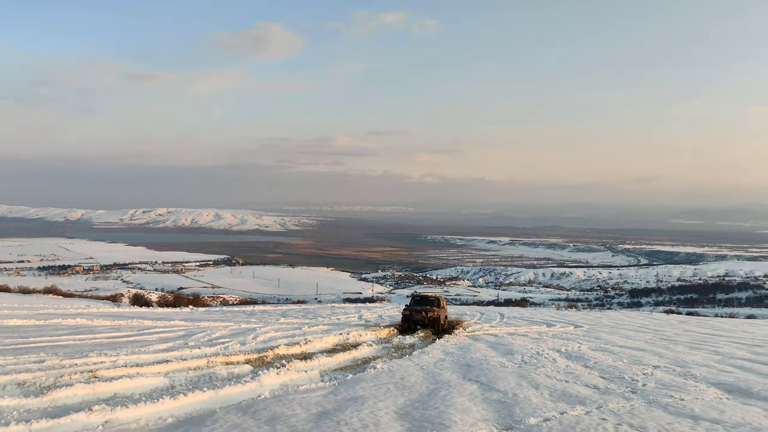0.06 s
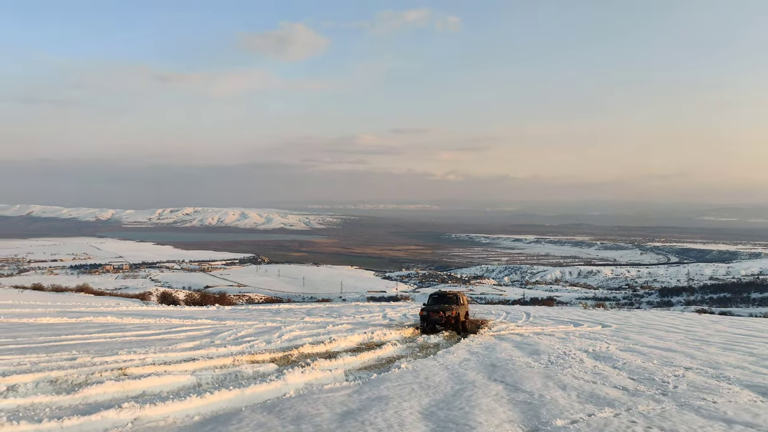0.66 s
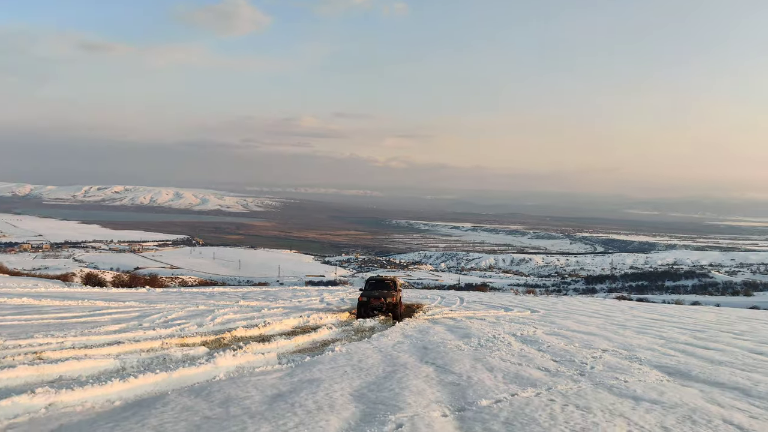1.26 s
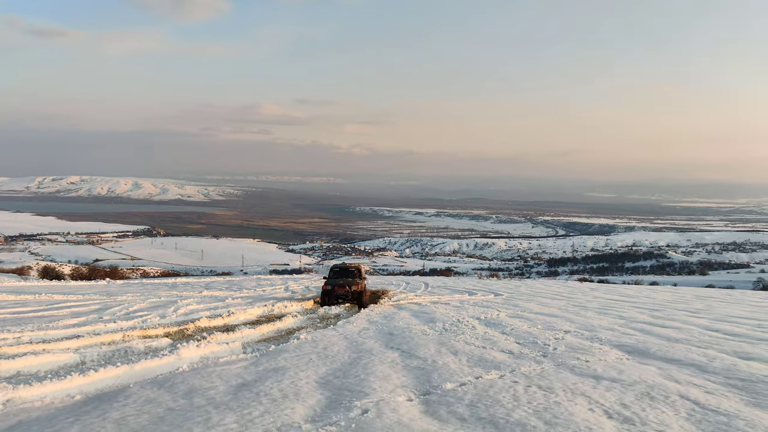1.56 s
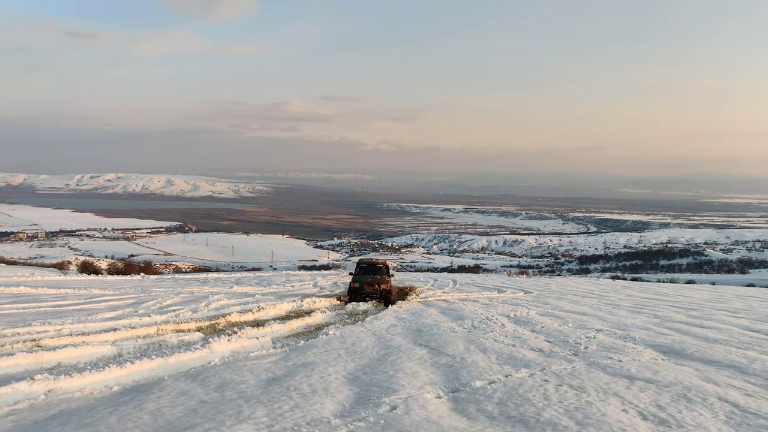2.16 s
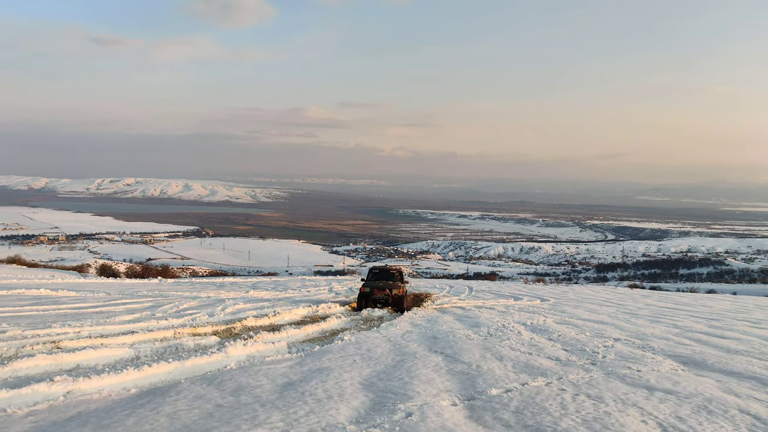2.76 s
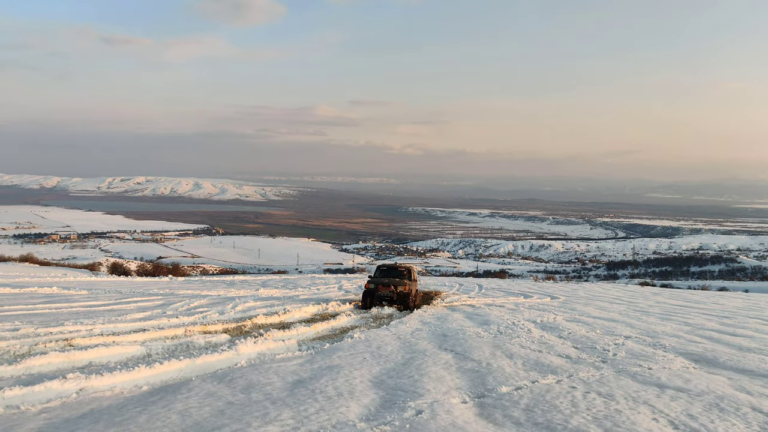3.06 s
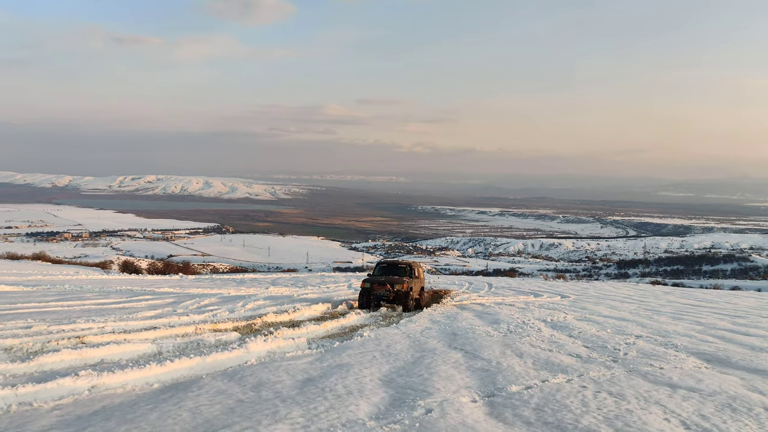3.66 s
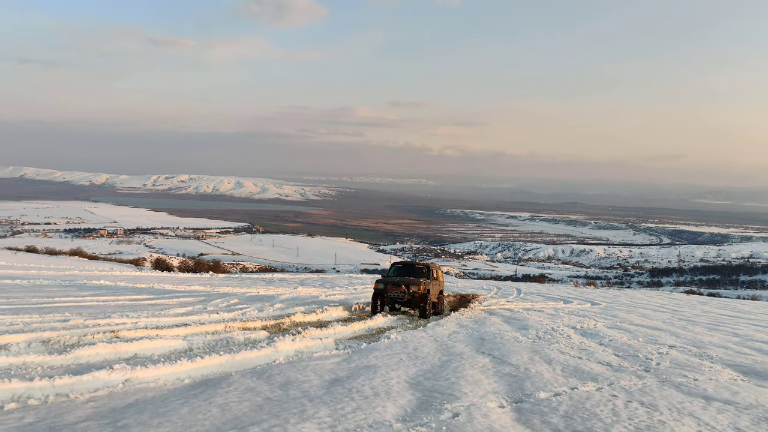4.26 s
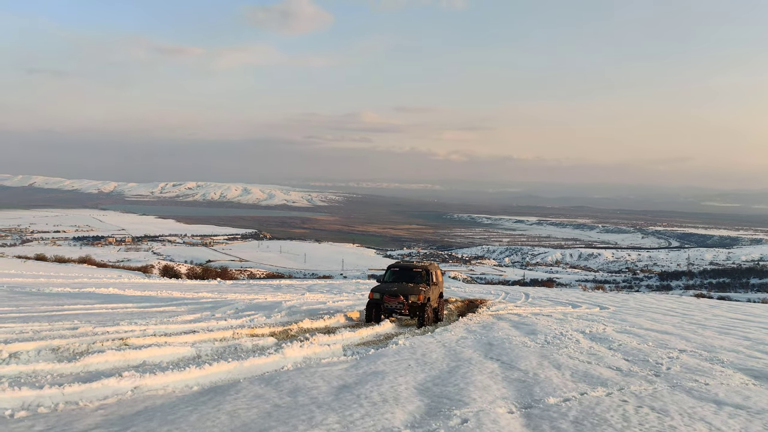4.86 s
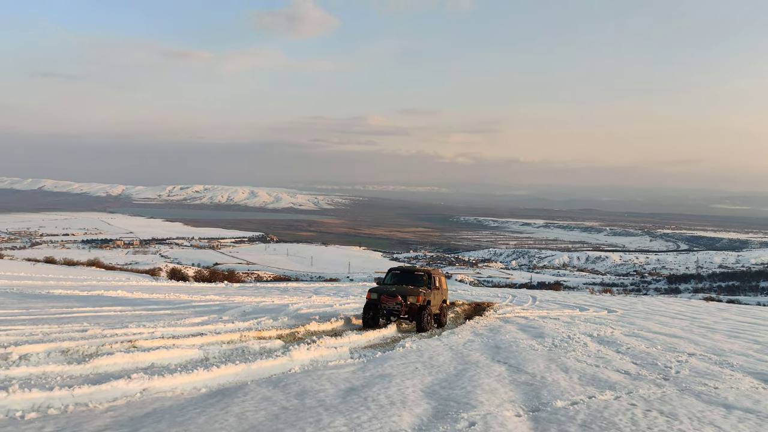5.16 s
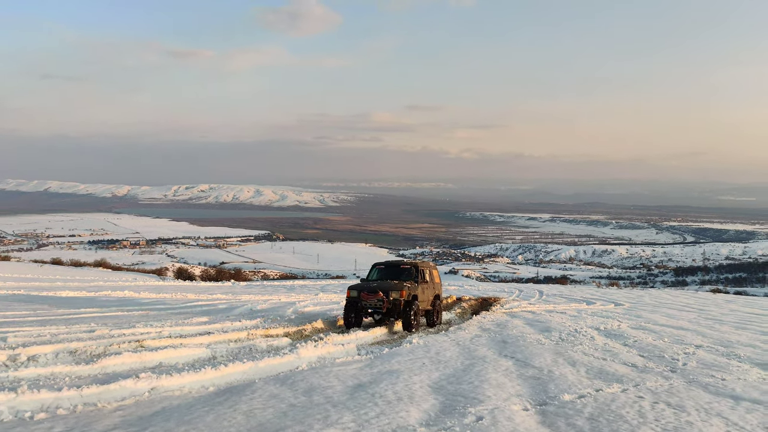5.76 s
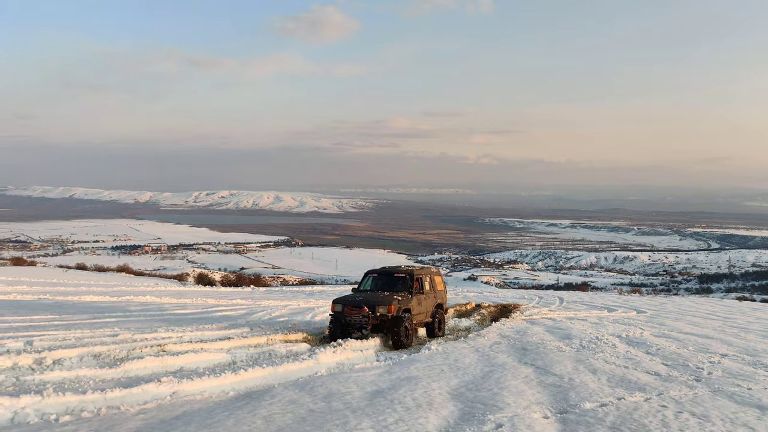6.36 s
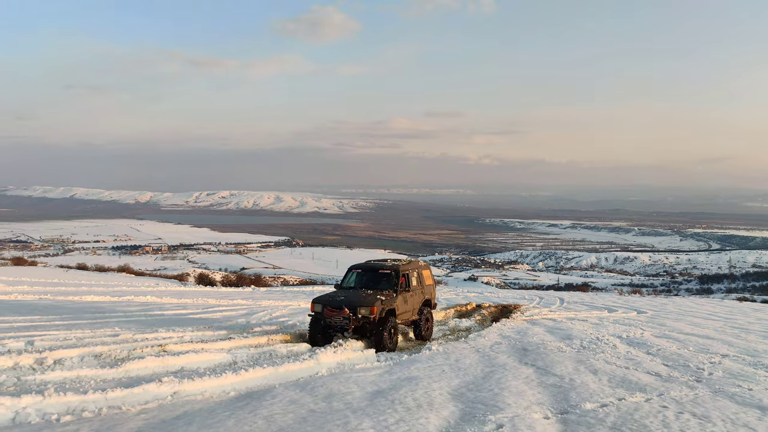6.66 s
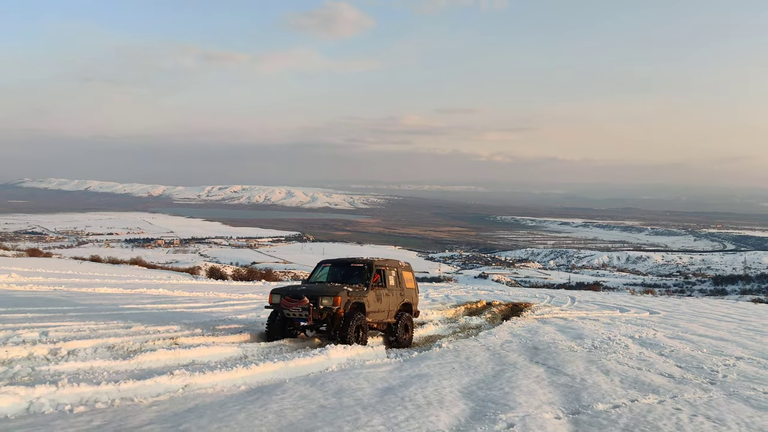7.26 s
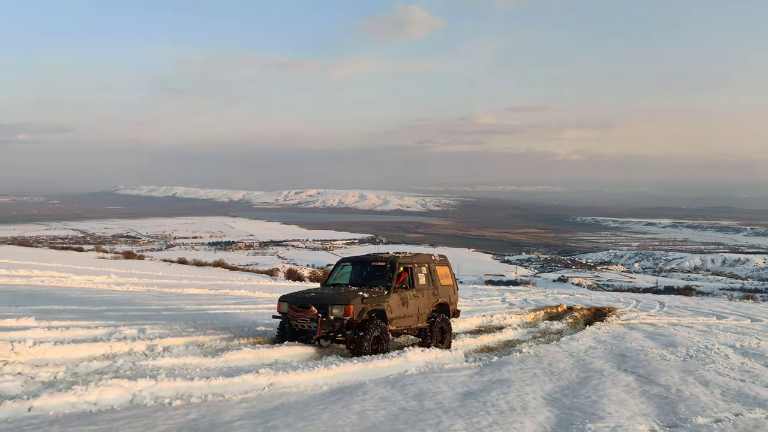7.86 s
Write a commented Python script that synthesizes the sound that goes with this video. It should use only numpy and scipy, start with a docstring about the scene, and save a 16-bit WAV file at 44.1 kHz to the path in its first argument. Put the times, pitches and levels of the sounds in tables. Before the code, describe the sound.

Wind buffets the microphone as an off-road vehicle drones nearer, its revs sagging and rising over crunching snow.

```python
"""An open snowy slope, heard through a two-port microphone standing in the wind.
A four-wheel-drive labours up from about 42 m to 16 m, swings side-on and draws off, its revs sagging
and picking up as the wheels slip and grip. Exhaust puffs drone, each firing rattles the engine block,
and the tyres churn and spray snow, rasp and squeak. Right at the microphone, gusts rumble, flutter
and slap on the ports, mostly the windward left one."""
import sys
import numpy as np
from scipy import signal
from scipy.fft import rfft, irfft, next_fast_len
from scipy.io import wavfile
from scipy.ndimage import uniform_filter1d, minimum_filter1d

SR = 44100
rng = np.random.default_rng(int(sys.argv[2]) if len(sys.argv) > 2 else 0)


def generate_wav(signal):
    """Clip the signal to [-1, 1] and save it as 16-bit WAV at the path in sys.argv[1]."""
    frames = np.transpose(np.atleast_2d(signal))
    scaled = np.clip(frames, -1, 1) * 32767
    pcm = np.round(scaled).astype(np.int16)
    wavfile.write(sys.argv[1], SR, pcm)


N = 348390
T = np.arange(N) / SR
HZ = np.maximum(np.arange(next_fast_len(N) // 2 + 1) * SR / next_fast_len(N), 1)

# the vehicle's range from the microphone: time_s, distance_m
DISTANCE = [(0, 42.5), (3.2, 39.6), (4.8, 38.2), (6.0, 22.4), (7.1, 15.6), (7.9, 26.7)]
# revs sagging in deep snow and picking up: time_s, firing_hz
REVS = [(0, 71), (0.3, 78), (0.8, 82), (1.2, 76), (1.85, 75), (2.2, 70), (2.5, 72.5), (2.95, 66),
        (3.35, 76), (3.65, 87.5), (4.55, 87), (4.95, 84), (5.3, 88.6), (5.65, 84.5), (5.87, 87.5),
        (6.17, 88.4), (6.36, 92.3), (6.59, 87.4), (6.76, 84.8), (7.07, 96), (7.15, 95), (7.28, 90.5),
        (7.5, 90), (7.9, 82.7)]
# how hard the exhaust works; the driver lifts off near 3 s, then opens up again: time_s, effort_db
THROTTLE = [(0, -1), (1.8, -5.5), (2.5, -1), (3.2, -24), (3.9, -2.5), (5.2, 0.5), (5.9, -1), (6.9, 0),
            (7.55, -4.5), (7.9, 0.5)]
# exhaust overtones as pipe and silencer pass them: frequency_hz, gain_db
PIPE_RESPONSE = [(130, -2), (155, 1), (172, 1), (192, 0.8), (225, -16), (265, -7.5), (350, -12),
                 (440, -12.5), (530, -13.5), (640, -21), (740, -19), (880, -21), (1000, -27), (1200, -25)]
# spectra of the pipe's growl and the block's clatter: frequency_hz, level_db
GROWL_SPECTRUM = [(60, -27), (200, 2.5), (400, 8), (620, 6.5), (800, 4), (1020, 2), (1200, 8.5), (1400, 2),
                  (2500, -35), (5000, -53)]
CLATTER_SPECTRUM = [(100, -13), (500, -7), (750, 2), (1000, -3.5), (1200, 2), (1430, -2), (1800, 2),
                    (2250, -2.5), (2650, -7), (3600, -7.5), (5500, -21.5), (9000, -72)]
# ringing of the engine block: pitch_hz, level_db, t60_s
BLOCK_MODES = [(774, 9, 0.0092), (1202, 2.5, 0.021), (1770, -11, 0.0037), (2720, -2.5, 0.009),
               (3570, -9, 0.011)]
# spectra of crushed crust and of flying ice grains: frequency_hz, level_db
CHURN_SPECTRUM = [(1200, -18), (2500, 6), (3500, 2.5), (5200, 0), (7300, -0.5), (8500, -14), (12000, -31.5)]
SPRAY_SPECTRUM = [(2000, -19), (5000, 5.5), (7500, 7.5), (9000, 1), (11000, -1), (14000, -3.5),
                  (16000, -43)]
# wheels slip, the engine strains, snow flies: start_s, length_s, clatter_db, churn_db, spray_db
WHEEL_SLIPS = [(0.095, 0.14, 3.5, 5.5, 0.5), (0.303, 0.046, 1, 5.4, 3.6), (0.733, 0.12, -3.5, 1.6, 1),
               (0.894, 0.061, 4.5, 6.3, 6), (1.07, 0.19, 1.5, 3.5, 0.85), (1.293, 0.084, 5.5, 5, 3),
               (1.42, 0.49, 2.5, 2.6, 1.3), (2.137, 0.096, 3.5, 3.7, 7.3), (2.53, 0.28, 3, 1.2, 3),
               (2.768, 0.17, 4, 6.4, 7), (3.0, 0.27, -1, 1.5, 3), (3.293, 0.11, -1, 6.3, 10),
               (3.43, 0.15, -2.5, 5.2, 11.5), (3.59, 0.08, -5, 1.5, 3.3), (3.704, 0.065, 1, 8.4, 13),
               (3.87, 0.13, -0.5, 1.6, 4.9), (4.095, 0.33, 2.5, 3.7, 2.2), (4.57, 0.08, 1.5, 6.9, 9.4),
               (4.992, 0.2, 5.5, 2, 3.4), (5.555, 0.14, 2.5, 2.5, 4), (5.78, 0.18, 6.5, 1.5, 4.6),
               (6.004, 0.14, 4, 3, 2.8), (6.29, 0.13, 2.5, 2.3, 1.2), (6.514, 0.28, 1.5, 1.6, 5.5),
               (6.833, 0.2, 1, 3, 4.3), (7.06, 0.098, 2.5, 3.4, 4.5), (7.265, 0.14, -1.5, 2.5, 3),
               (7.38, 0.15, 2.5, 3.2, 4.5), (7.785, 0.26, 3.5, 2.5, 1)]
# a tyre rasps (wide) or squeaks (narrow): centre_s, length_s, pitch_hz, width_hz, level_db
TYRE_SQUEAKS = [(1.505, 0.69, 2780, 1100, -43.5), (2.14, 0.42, 2040, 810, -42),
                (2.826, 0.2, 2190, 200, -41), (2.87, 0.2, 1760, 360, -40.5),
                (2.893, 0.036, 2230, 55, -30.5), (6.87, 0.14, 2720, 160, -39)]
# the recorder's gain ducks briefly in the wind, dimming engine and snow: start_s, length_s, depth_db
GAIN_DUCKS = [(0.233, 0.45, 3.5), (1.005, 0.057, 5.5), (1.356, 0.035, 6), (1.826, 0.056, 3.5),
              (1.95, 0.049, 4.5), (2.357, 0.13, 4), (3.235, 0.049, 1.5), (3.367, 0.038, 4.5),
              (6.427, 0.1, 4.5), (7.186, 0.025, 5), (7.534, 0.12, 4.5)]

# likeness of the vehicle's noise at the two ports: frequency_hz, correlation
PORT_LIKENESS = [(200, 1), (1500, 0.79), (3000, 0.68), (6500, 0.099), (12000, 0.13)]
# resonances and notches, left port then right: centre_hz, width_hz, head_on_db, turning_db, side_on_db
PORT_RESONANCES = [
    [(1380, 170, -2, 0.5, -4), (2160, 1900, -3, -4, -2), (3160, 97, -4, 0, -8), (3770, 120, -2.5, 5, -2),
     (3980, 110, 3, -5, 5), (4850, 110, 1, -4, 1), (5030, 170, 5, 12, 9), (6820, 1910, -11, -11, -10.5),
     (8600, 620, 3, 4, 0)],
    [(1190, 76, -3, 1, -3), (1460, 270, 0, -2.5, -2), (2130, 450, -1, 0, 2), (2990, 88, -13, -7, -10.5),
     (3440, 190, 2, -0.5, 4), (4024, 128, -14, -11, -6), (4400, 130, 2, -1, 5), (4920, 170, -2, 1, -3),
     (5330, 200, 0.5, 1, 4.5), (6210, 150, -1, -11, -2), (6670, 280, 3, 4.5, 0.5), (8400, 240, -3, -7, -7)],
]
# those of the right port wander as the microphone is moved: time_s, frequency_ratio
RIGHT_PORT_SHIFT = [(0, 1.01), (0.6, 1.01), (1.0, 1), (1.9, 0.96), (2.3, 1.02), (2.6, 0.98), (2.95, 1),
                    (3.4, 1.01), (4.3, 1.015), (4.8, 1.01), (5.3, 1.035), (5.7, 0.99), (6.1, 1.02),
                    (6.55, 1), (7.0, 0.98), (7.9, 0.97)]

# breeze on the ports between gusts: time_s, left_db, right_db
BREEZE = [(0, -19, -15.5), (0.5, -10.5, -17), (1.1, -12, -16), (1.4, -11, -25.5), (1.7, -15.5, -24),
          (1.79, -10, -33), (2.05, -12.5, -21), (2.6, -12, -20.5), (2.9, -10.5, -16), (3.15, -18, -25.5),
          (3.4, -14, -23), (4.1, -13, -21), (4.5, -11, -17.5), (5.0, -14.5, -26.5), (5.9, -17, -16),
          (6.3, -15, -17.5), (6.6, -17, -11), (6.95, -16.5, -19.5), (7.25, -12.5, -20), (7.9, -15.5, -12.5)]
# the breeze drops for a moment (negative depth lifts it): start_s, length_s, depth_db
LULLS = [(0.04, 0.071, 2.5), (0.166, 0.039, 4), (0.266, 0.026, 0), (1.045, 0.082, 7), (1.544, 0.068, 10.5),
         (1.68, 0.06, 8.5), (1.982, 0.041, 5), (2.076, 0.063, 8), (2.528, 0.038, 6), (2.717, 0.062, 9),
         (2.806, 0.05, 6), (2.993, 0.068, 3.5), (3.125, 0.055, -1), (3.283, 0.02, -2), (3.802, 0.064, 9),
         (4.02, 0.026, 12), (4.339, 0.023, 8), (4.464, 0.033, 8), (4.572, 0.041, 4.5), (4.677, 0.063, 6),
         (4.85, 0.025, 5), (4.938, 0.062, 4), (5.55, 0.025, 6), (5.729, 0.041, 2), (6.016, 0.052, 2),
         (6.21, 0.066, 3), (6.464, 0.078, 9), (6.674, 0.077, 2)]
# gusts, eddies over a swell of rumble: start_s, length_s, level_db, reach_hz, port (0 left, 1 right)
GUSTS = [(0.194, 0.054, -15, 320, 1), (0.22, 0.27, -25.5, 655, 0), (0.385, 0.094, -20, 480, 1),
         (0.542, 0.15, -21.5, 746, 0), (0.834, 0.1, -14, 750, 0), (0.97, 0.045, -15, 596, 0),
         (1.127, 0.046, -15, 610, 0), (1.3, 0.13, -23.5, 860, 0), (1.794, 0.073, -19, 665, 0),
         (1.914, 0.063, -14.5, 645, 0), (2.17, 0.067, -25, 594, 0), (2.3, 0.054, -19, 630, 0),
         (2.385, 0.074, -20.5, 624, 0), (2.317, 0.066, -15, 434, 1), (2.599, 0.083, -23, 353, 0),
         (2.86, 0.1, -25, 383, 0), (3.206, 0.046, -14.5, 560, 0), (3.419, 0.072, -14.5, 754, 0),
         (3.538, 0.033, -11, 680, 0), (3.61, 0.047, -15, 597, 0), (3.66, 0.084, -29, 220, 0),
         (4.06, 0.16, -26, 218, 0), (4.431, 0.033, -21, 477, 1), (4.562, 0.026, -19, 440, 1),
         (4.786, 0.048, -15, 500, 0), (4.881, 0.047, -22, 300, 1), (5.039, 0.16, -25.5, 428, 0),
         (5.219, 0.065, -14.5, 530, 1), (5.292, 0.2, -17, 575, 0), (5.585, 0.13, -19.5, 445, 0),
         (5.87, 0.11, -17.5, 633, 0), (6.09, 0.13, -20, 340, 0), (6.36, 0.084, -20.5, 480, 0),
         (6.351, 0.08, -17.5, 320, 1), (6.533, 0.11, -16.5, 440, 0), (7.23, 0.17, -20, 583, 0),
         (7.439, 0.063, -11, 614, 0), (7.51, 0.15, -15.5, 345, 0), (7.69, 0.083, -15.5, 420, 1)]
# slaps on the windward left port: time_s, level_db, reach_hz, length_s
WIND_SLAPS = [(0.134, -18, 383, 0.0075), (0.242, -21.5, 720, .014), (0.332, -16.5, 880, .008),
              (0.376, -22, 1040, 0.0092), (0.433, -18, 650, .014), (0.497, -17, 563, 0.0091),
              (0.602, -18, 970, 0.0077), (0.627, -21, 850, 0.0085), (0.733, -19, 600, .01),
              (0.686, -20, 745, 0.014), (0.851, -23, 846, .008), (0.876, -15, 900, 0.0072),
              (0.894, -14, 950, 0.0087), (0.911, -22, 1000, 0.0028), (0.931, -12, 1070, 0.0037),
              (0.982, -20, 695, 0.0034), (0.997, -16, 880, 0.0058), (1.247, -15, 796, 0.0087),
              (1.304, -19, 900, 0.0067), (1.371, -18, 950, 0.015), (1.039, -18.5, 684, 0.0069),
              (1.163, -11, 940, 0.007), (1.329, -15, 1040, 0.0059), (1.445, -19, 660, 0.011),
              (1.503, -15, 467, 0.0097), (1.529, -16, 646, 0.0053), (1.643, -14, 620, 0.0057),
              (1.664, -20.5, 524, 0.0067), (1.854, -1, 870, 0.0068), (2.051, -22, 390, 0.012),
              (2.199, -15, 600, 0.0067), (2.228, -15, 680, 0.0071), (2.284, -20, 775, 0.011),
              (2.331, -15, 634, 0.014), (2.464, -20, 720, 0.014), (2.513, -24, 520, 0.0069),
              (2.686, -14.5, 516, 0.011), (2.782, -17.5, 388, 0.011), (2.927, -11, 730, 0.0061),
              (2.958, -18.5, 530, 0.016), (3.071, -12, 360, 0.0074), (3.221, -16, 620, 0.0065),
              (3.234, -15.5, 746, 0.006), (3.375, -18.5, 480, 0.0098), (3.427, -16, 940, 0.012),
              (3.566, -20, 700, 0.018), (3.631, -30, 600, 0.014), (3.785, -18.5, 450, 0.0094),
              (3.883, -11, 474, 0.011), (3.907, -20, 760, 0.0074), (4.01, -19, 375, .01),
              (4.178, -20, 398, 0.0165), (4.263, -16.5, 483, 0.013), (4.32, -13, 710, 0.0075),
              (4.383, -15, 514, 0.016), (4.648, -17.5, 684, 0.01), (4.802, -15, 674, 0.0082),
              (4.903, -15.5, 620, 0.015), (5.052, -15.5, 504, 0.011), (5.135, -15.5, 604, 0.012),
              (5.411, -10, 790, 0.0067), (5.43, -22, 750, 0.0097), (5.44, -12, 646, 0.0093),
              (5.487, -11, 587, 0.0065), (5.618, -15.5, 825, 0.0071), (5.64, -24, 650, 0.0054),
              (5.658, -13, 607, 0.0057), (5.7, -20, 700, 0.0048), (5.909, -15, 854, 0.0046),
              (7.47, -13, 750, 0.0046), (7.572, -15, 1370, 0.0042), (7.58, -11, 950, 0.011),
              (7.606, -11, 570, 0.0054), (7.642, -16, 570, 0.0096)]
# spectra of the wind's rumble and of the flutter that strong wind adds: frequency_hz, level_db
RUMBLE_SPECTRUM = [(10, -10.5), (22, -1.5), (38, 0), (65, -3), (110, -6.5), (170, -14), (260, -31.5),
                   (500, -39), (2000, -100)]
FLUTTER_SPECTRUM = [(50, -24), (110, -3.5), (170, -1), (240, -2), (330, -15), (500, -26.5), (900, -29),
                    (2000, -88)]

REFERENCE_M = 20
BOOM_DB, OVERTONES_DB = -23, -25   # at REFERENCE_M and 0 dB effort, ahead of the pipe's colouring
CLATTER_DB, CHURN_DB, SPRAY_DB = -34, -39, -51.5   # at REFERENCE_M, tyres gripping
OVERTONES_FALLOFF = 1.87   # snow soaks up the overtones, so they fade faster with distance
SLIP_RISE_S, SLIP_FALL_S = 0.067, 0.047   # the wheels grip faster than they spin up
DUCK_RAMP_S, GUST_RAMP_S, LULL_RAMP_S = 0.015, 0.016, 0.009
TURN_S, SIDE_ON_S, TURN_EASE_S = 5.82, 7, 0.12   # the vehicle swings round, then shows its side


def vehicle(waver_db=1.14):
    """Exhaust follows the throttle, clatter and snow the wheel slip; these grow as the range closes."""
    (firing_hz,), (effort_db,), (distance_m,) = in_time(REVS), in_time(THROTTLE), in_time(DISTANCE)
    near_db = 20 * np.log10(REFERENCE_M / distance_m)
    strain_db, dig_db, throw_db = sum(np.outer(rises_db, swell(s, length, SLIP_RISE_S, SLIP_FALL_S))
                                      for s, length, *rises_db in WHEEL_SLIPS)
    duck_db = sum(db * swell(s, length, DUCK_RAMP_S, DUCK_RAMP_S) for s, length, db in GAIN_DUCKS)
    gain_db = waver_db * drift(13) - duck_db
    overtone_db = OVERTONES_DB + OVERTONES_FALLOFF * near_db + effort_db
    firings = np.cumsum(firing_hz * (1 + 0.004 * drift(20))) / SR   # running count, one per puff
    flicker_db = drift(21)
    drone = exhaust(firing_hz, firings, BOOM_DB + near_db + effort_db, overtone_db + flicker_db)
    rattle = clatter(firings, CLATTER_DB + near_db + strain_db, growl_db=overtone_db - 10)
    knocks = block_knock(firings, level_db=overtone_db - 9)
    tyres = snow(CHURN_DB + near_db + dig_db, SPRAY_DB + near_db + throw_db)
    return from_db(gain_db) * (drone + rattle + knocks + tyres) + tyre_squeaks()


def exhaust(firing_hz, firings, boom_db, overtone_db, uneven_db=-12):
    """One steep-fronted puff per firing; unequal cylinders put weak lines between the harmonics."""
    puffs = from_db(boom_db) * np.sin(2 * np.pi * firings)
    for k in range(2, 15):
        harmonic = np.sin(2 * np.pi * k * firings)
        between = from_db(uneven_db) * np.sin(2 * np.pi * ((k - .5) * firings + rng.random()))
        ragged = 1 + min(.07 * (k - 1), .5) * drift(35)   # higher overtones are rougher
        gain = from_db(overtone_db + at_hz(PIPE_RESPONSE, k * firing_hz))
        puffs += gain * (harmonic + between) * ragged
    burn = 1 + .22 * drift(30)
    return -np.sqrt(2) * puffs * burn


def clatter(firings, block_db, growl_db, uneven_db=0.94, lead_cycles=0.055):
    """Each firing shakes a burst of noise out of the block and blows a turbulent growl from the pipe."""
    cycle = (firings + lead_cycles) % 1
    bursts = (1 + 2.1 * np.exp(-cycle / .2)) * from_db(uneven_db * drift(51))
    block = from_db(block_db) * far_noise(CLATTER_SPECTRUM, bursts)
    return block + from_db(growl_db) * far_noise(GROWL_SPECTRUM, bursts)


def block_knock(firings, level_db, uneven_db=1.8, lead_cycles=0.11):
    """Each firing sets the block ringing just before the exhaust puff, never twice equally hard."""
    strikes = np.diff(np.floor(firings + lead_cycles), prepend=0)
    strikes *= from_db(uneven_db * rng.standard_normal(N))
    ringing = 0
    for k, (hz, db, t60) in enumerate(BLOCK_MODES):
        decay, angle = from_db(-60 / (t60 * SR)), 2 * np.pi * hz / SR   # per sample
        mode = signal.lfilter([0, np.sin(angle)], [1, -2 * decay * np.cos(angle), decay ** 2],
                              strikes + 1e-18)
        ringing += (-1) ** k * from_db(db) * mode
    return from_db(level_db) * rms_one(ringing)


def snow(churn_db, spray_db, crunch_db=1.5):
    """The treads crush the crust in clumps and throw off fine grains of ice."""
    churn = from_db(churn_db) * far_noise(CHURN_SPECTRUM, bursts=from_db(crunch_db * drift(88)))
    spray = from_db(spray_db) * far_noise(SPRAY_SPECTRUM, bursts=from_db(drift(1500)))
    return churn + spray


def tyre_squeaks():
    """Rubber sticks and slips on packed snow: a wide band rasps, a narrow one squeaks."""
    out = np.zeros(N)
    for s, length, hz, width, db in TYRE_SQUEAKS:
        band = shaped(rng.standard_normal(N), bell(HZ, hz, width / 2))
        out += from_db(db) * bell(T, s, length / 2) * evened(band, 0.037)
    return out


def through_ports(sound, left_lag_s=3e-5):
    """Each port colours the vehicle's sound by its angle; the left one hears it slightly later."""
    hz, s, frames = signal.stft(sound, SR, nperseg=1024)
    hz = hz[:, None]
    turned, side_on = (.5 + .5 * np.tanh((s - at) / TURN_EASE_S) for at in (TURN_S, SIDE_ON_S))
    angle_shares = [1 - turned, turned - side_on, side_on]
    shifts = 1, np.interp(s, *np.transpose(RIGHT_PORT_SHIFT))
    left_db, right_db = (
        sum(np.dot(dbs, angle_shares) * bell(hz, centre * shift, width) for centre, width, *dbs in port)
        for port, shift in zip(PORT_RESONANCES, shifts))
    lag = np.exp(-2j * np.pi * hz * left_lag_s)
    return signal.istft(frames * [from_db(left_db) * lag, from_db(right_db)], SR, nperseg=1024)[1][:, :N]


def wind(gust_rumble_db=6):
    """Breeze and gusts press directly on the microphone's two ports."""
    gust = np.zeros((2, N))
    for s, length, db, _, port in GUSTS:
        gust[port] += from_db(db + gust_rumble_db) * swell(s, length, GUST_RAMP_S, GUST_RAMP_S)
    lull_db = sum(db * swell(s, length, LULL_RAMP_S, LULL_RAMP_S) for s, length, db in LULLS)
    pressure = np.hypot(from_db(in_time(BREEZE) - lull_db), gust)
    return rumble(pressure) + stray_eddies(pressure) + gust_eddies() + wind_slaps()


def rumble(pressure, usual_wind_db=-14, usual_flutter_db=-27, steepness=1.24, heave_db=2.08):
    """Large slow eddies press on each port in lumps; flutter rides on them and grows faster."""
    wind_db = 20 * np.log10(pressure) + heave_db * np.array([drift(7), drift(7)])
    lumps = np.array([drift(22), drift(33)])
    low = from_db(wind_db + 2.1 * lumps) * evened(port_noise(RUMBLE_SPECTRUM), .1)
    flutter_db = usual_flutter_db + steepness * (wind_db - usual_wind_db) + 6 * lumps
    return low + from_db(flutter_db) * evened(port_noise(FLUTTER_SPECTRUM), 0.034)


def wind_slaps(eddies_per_s=520, main_dip=1.52, scatter=0.604, gain_db=5):
    """A slap is one sharp dip in pressure amid a cluster of smaller eddies; finer eddies reach higher."""
    out, span = np.zeros((2, N + SR)), SR // 4
    middle = span // 2
    draws = rng.standard_normal((len(WIND_SLAPS), 2, 64))
    for (s, db, reach_hz, length), (when, size) in zip(WIND_SLAPS, draws):
        count = int(length * eddies_per_s)
        offsets = np.tanh(when[:count] + 0.284) * scatter * length * SR   # most trail the main dip
        dips = np.zeros(span)
        dips[middle + offsets.astype(int)] = size[:count]
        dips[middle] = -main_dip
        slap = rms_one(eddy_thumps(dips, [0.093 * reach_hz, 0.54 * reach_hz], "band", reach_hz))
        start = round(s * SR)
        out[0, start:start + span] += from_db(db + gain_db) * np.sqrt(length * SR / span) * slap
    return out[:, middle:middle + N]


def gust_eddies(eddies_per_s=380, body_hz=(130, 480)):
    """Eddies strike a port at random, in ragged clumps, while a gust lasts."""
    dips = (rng.random((2, N)) < eddies_per_s / SR) * rng.standard_normal((2, N))
    clumps = from_db(7 * np.tanh(drift(28)))
    out = np.zeros((2, N))
    for s, length, db, reach_hz, port in GUSTS:
        during = slice(*np.searchsorted(T, [s - GUST_RAMP_S, s + length + GUST_RAMP_S]))
        eddies = eddy_thumps(dips[port, during], body_hz, "band", reach_hz) * clumps[during]
        envelope = swell(s, length, GUST_RAMP_S, GUST_RAMP_S)[during]
        out[port, during] += from_db(db) * envelope * rms_one(eddies)
    return out


def stray_eddies(pressure, eddies_per_s=14, low_hz=70, gain_db=-15):
    """Soft, lone eddies thump the ports, as hard as the wind blows."""
    dips = (rng.random((2, N)) < eddies_per_s / SR) * (1 + rng.random((2, N)))
    return -from_db(gain_db) * pressure * rms_one(eddy_thumps(dips, low_hz, "high", reach_hz=270))


def eddy_thumps(dips, body_hz, body_type, reach_hz):
    """Round pressure spikes into thumps with little above reach_hz."""
    body = signal.butter(1, body_hz, body_type, fs=SR, output="sos")
    rounding = signal.butter(3, reach_hz, fs=SR, output="sos")
    return signal.sosfilt(np.vstack([body, rounding]), dips + 1e-18)


def far_noise(spectrum, bursts):
    """Coloured bursts of noise from a distance, alike at the two ports in the bass, less so on top."""
    mid, side = rng.standard_normal((2, N)) * bursts
    alike, colour = at_hz(PORT_LIKENESS, HZ), from_db(at_hz(spectrum, HZ))
    common = shaped(mid, colour * np.sqrt(1 + alike))
    opposed = shaped(side, colour * np.sqrt(1 - alike)) * [[1], [-1]]
    return rms_one(common + opposed)


def port_noise(spectrum):
    """Coloured noise made at the microphone, unrelated at the two ports."""
    return rms_one(shaped(rng.standard_normal((2, N)), from_db(at_hz(spectrum, HZ))))


def drift(rate_hz):
    """Random wander with an rms of 1, rolling off around rate_hz."""
    phases = np.exp(2j * np.pi * rng.random(len(HZ) // 4))
    return rms_one(irfft(phases * bell(HZ[:len(phases)], 0, rate_hz), next_fast_len(N))[:N])


def swell(start_s, length_s, rise_s, fall_s):
    """Rise, hold and fall between 0 and 1."""
    top_s, end_s = start_s + rise_s / 2, start_s + length_s
    corners_s = [start_s - rise_s / 2, top_s, max(top_s, end_s - fall_s / 2), end_s + fall_s / 2]
    return np.interp(T, corners_s, [0, 1, 1, 0])


def shaped(x, gain):
    """Filter by a gain at each frequency."""
    size = next_fast_len(N)
    return irfft(rfft(x, size) * gain, size)[..., :N]


def bell(x, centre, spread):
    """A bell curve of height 1."""
    return np.exp(-.5 * np.minimum(((x - centre) / spread) ** 2, 100))


def in_time(rows):
    """Each column of a curve table at every sample."""
    s, *columns = np.transpose(rows)
    return [np.interp(T, s, column) for column in columns]


def at_hz(points, hz):
    """Read a table on a log-frequency axis."""
    at, value = np.transpose(points)
    return np.interp(np.log(hz), np.log(at), value)


def evened(x, span_s):
    """Hold the running rms at 1."""
    return x / np.sqrt(np.abs(uniform_filter1d(x ** 2, int(span_s * SR))) + 1e-12)


def rms_one(x):
    """Scale to an rms of 1."""
    return x / np.sqrt(np.mean(x ** 2) + 1e-20)


def from_db(db):
    """Decibels to gain."""
    return 10 ** (np.asarray(db) / 20)


def scene():
    """The vehicle out on the open slope, the wind right at the microphone."""
    return through_ports(vehicle()) + wind()


def record(dry, ceiling=0.9, hold_s=0.01, cutoff_hz=15400):
    """A limiter holds each channel's peaks down; the top is cut."""
    span = int(hold_s * SR)
    allowed_gain = np.minimum(1, ceiling / (np.abs(dry) + 1e-9))
    gain = uniform_filter1d(minimum_filter1d(allowed_gain, span), span)
    fade_in = np.minimum(T / .004, 1)
    top_cut = signal.ellip(12, .1, 90, cutoff_hz, fs=SR, output="sos")
    return signal.sosfilt(top_cut, dry * gain * fade_in)


dry = scene()
out = record(dry)
generate_wav(out)
```